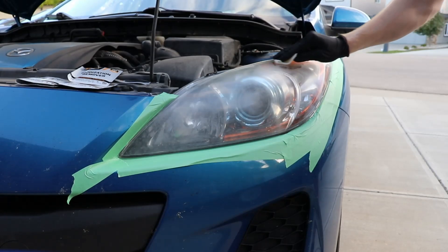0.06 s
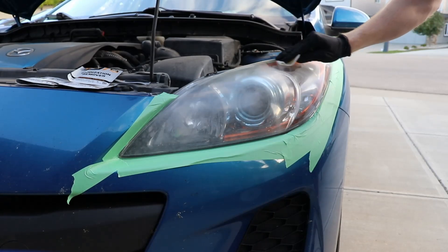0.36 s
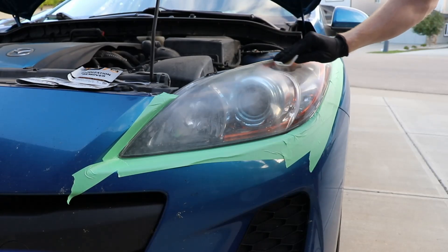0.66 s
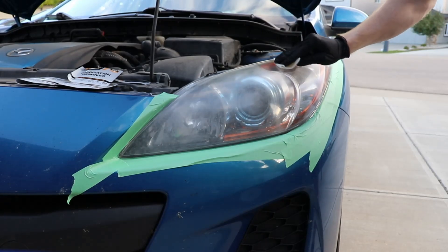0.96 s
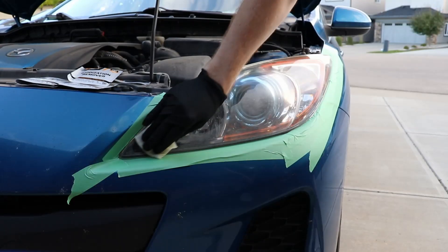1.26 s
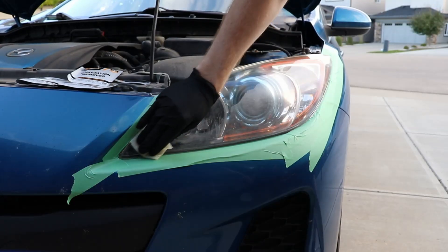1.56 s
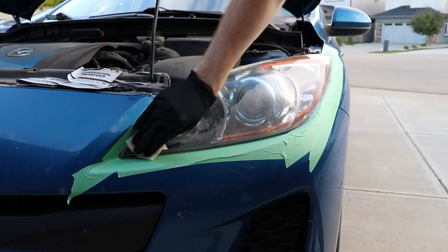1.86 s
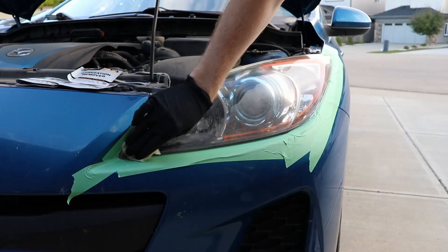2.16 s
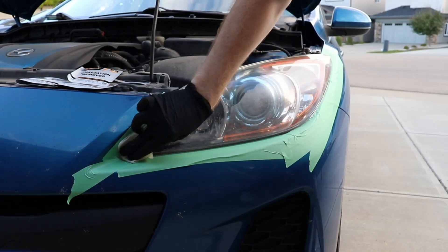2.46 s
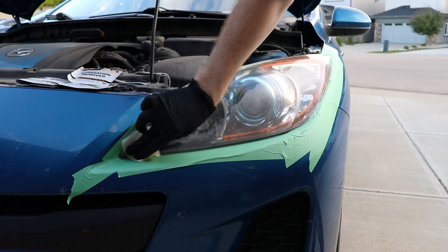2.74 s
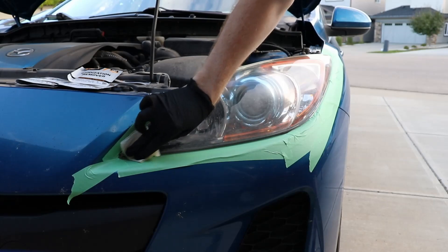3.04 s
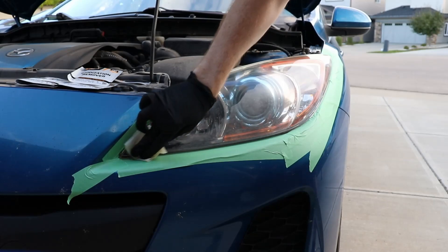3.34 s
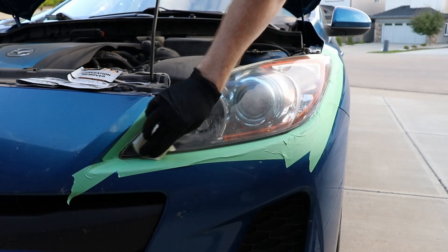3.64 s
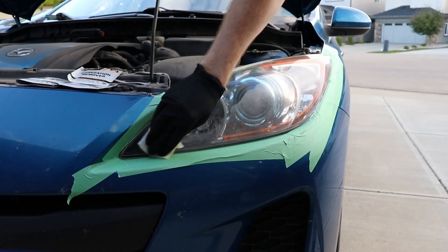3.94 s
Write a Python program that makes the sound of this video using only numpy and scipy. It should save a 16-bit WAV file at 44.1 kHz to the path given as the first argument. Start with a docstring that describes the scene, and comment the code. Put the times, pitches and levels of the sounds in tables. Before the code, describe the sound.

An abrasive pad rubs a plastic headlight close by, with a few faint, hissing strokes in the first second. From about 1.2 seconds to the end at 4, it scrubs in short, firmer, scratchy strokes. A low outdoor rush and a distant engine drone lie behind, with a soft wind puff near 0.6 seconds. Around 2.8 seconds a second engine revs up, holding its pitch from about 3.3.

```python
"""On a driveway, an abrasive pad is rubbed by hand over a plastic headlight lens: lightly at the far end,
then in short, firm strokes at the near corner. Countless tiny slips blur into scrape, hiss and fizz,
patches of the plastic ring under the pressure, and a few grains of grit catch with a tick.
Behind it sits a bed of outdoor rush with one puff of wind. A distant engine drones, and a second engine
runs up and holds its speed, both humming on multiples of their firing rate."""
import sys
import numpy as np
from scipy import signal
from scipy.fft import rfft, irfft, next_fast_len
from scipy.io import wavfile
from scipy.ndimage import uniform_filter1d, map_coordinates

SR = 44100
rng = np.random.default_rng(int(sys.argv[2]) if len(sys.argv) > 2 else 0)


def to_wav(sig):
    """Store sig (one row per channel, or 1-D mono) as 16-bit WAV at the path in sys.argv[1].

    Samples outside -1..1 are clipped; the rate is SR.
    """
    pcm = np.clip(np.atleast_2d(sig), -1, 1) * 32767
    pcm = np.round(pcm).astype(np.int16)
    wavfile.write(sys.argv[1], SR, pcm.T)  # frames by channels


N = 176400

# The hand's strokes. Each row: start, length and attack in seconds, level in dB,
# scrape offset in dB, fizz and air offset in dB.
PAD_STROKES = [(0.0, 0.14, .03, -62.5, 1.5, 2.5), (0.154, 0.31, .03, -61, 0, 2),
               (0.494, 0.27, .04, -62, -8, 2), (.81, 0.12, .05, -61, -12, 3),
               (1.162, 0.042, 0.004, -51, 1, -3), (1.209, 0.071, .03, -53.5, -4, -0.5),
               (1.302, 0.13, 0.027, -54.5, -4.5, -2), (1.451, 0.055, 0.031, -53, -4, -1),
               (1.505, 0.059, 0.04, -50, -2, -1.5), (1.592, 0.12, 0.022, -54.5, 0, -2),
               (1.72, 0.057, .04, -52, -8.5, -2), (1.782, 0.074, 0.062, -49.5, 1.5, -1.5),
               (1.879, 0.087, 0.051, -52.5, -2.5, -1), (1.981, 0.04, 0.027, -53.5, 3, -15),
               (2.034, 0.028, 0.01, -49.5, 0.5, -4), (2.076, 0.093, 0.03, -52.5, 2.5, 0),
               (2.208, 0.039, 0.022, -60, 7, -8), (2.237, 0.05, .008, -51, 2.5, -2),
               (2.36, 0.12, 0.033, -51.5, 0.5, -2), (2.52, 0.082, 0.1, -52, -2.5, -6.5),
               (2.681, 0.086, 0.092, -55, 1.5, -1), (2.777, 0.1, .06, -51, -1.5, -1.5),
               (2.879, 0.04, .04, -51.5, -6, -8), (2.955, 0.11, 0.058, -55, 0, -1),
               (3.113, 0.057, 0.012, -52, 0.5, -1.5), (3.181, 0.05, .04, -53, -3, -9),
               (3.242, 0.069, .02, -55, 1.5, -1), (3.315, 0.047, .015, -49.5, -1.5, -7),
               (3.398, 0.082, 0.068, -53.5, 3, 1.5), (3.482, 0.11, .04, -54, 2, -2),
               (3.59, 0.099, .04, -54, 0.5, -5.5), (3.691, 0.11, 0.038, -52.5, 1, 0),
               (3.787, 0.12, 0.041, -51.5, -2, -2), (3.901, 0.061, 0.038, -54.5, 0, -3),
               (3.972, 0.089, 0.028, -53, 5.5, -2)]
# The pad's four voices, dark to bright. Each row: frequency in Hz, relative level in dB per Hz.
SCRAPE_COLOUR = [(150, -2), (400, 1.5), (800, 8), (1300, 6), (1900, 5), (2500, 2), (3100, 2.5),
                 (4000, -7.5), (6000, -23)]
HISS_COLOUR = [(1500, -44), (3000, -10), (4100, -2), (5600, -2.5), (6600, -7.5), (8000, -12.5),
               (12000, -31), (16000, -24)]
FIZZ_COLOUR = [(4000, -20), (6500, -3), (8000, 0), (9000, -0.5), (10200, -4.5), (11200, -13.5),
               (12300, -11), (13500, -18), (15800, -27)]
AIR_COLOUR = [(7000, -42), (10000, 1), (11500, 3), (12400, -.5), (13500, -5), (15800, -3)]
# Stereo width of the rubbing. Each row: frequency in Hz, left-right likeness from -1 to 1.
PAD_LIKENESS = [(300, 0.88), (1500, 0.28), (3500, 0.56), (6000, 0.26), (9000, 0.68), (15000, 0.28)]
# The lens reaches the left ear first. Each row: frequency in Hz, left lead in radians.
LENS_LEAD = [(100, 12.4), (1000, 0.58), (3000, 1.02), (5000, 1.5), (6500, 2.2), (8000, 2.37), (10000, 2.06),
             (12000, 3.3), (15500, 3.45)]
# Balance of the lens. Each row: frequency in Hz, left over right in dB.
LENS_PAN = [(500, 9.5), (1000, -3.5), (2000, -2.5), (4000, -1), (8000, 2.5), (13000, 2.5)]
# Patches that resonate where the pad bears down.
# Each row: start and length in seconds, first and last pitch in Hz, level in dB.
LENS_RINGS = [(0.191, 0.86, 10000, 9920, -62.5), (0.51, 0.058, 4700, 4770, -59),
              (1.165, 0.026, 1150, 1316, -50.5), (1.168, 0.074, 9100, 8400, -53.5),
              (1.528, .038, 3770, 2980, -55), (1.769, 0.06, 8700, 9100, -51),
              (2.027, 0.051, 4800, 2720, -50), (2.089, 0.053, 3370, 1475, -55.5),
              (2.374, 0.036, 4200, 2770, -50.5), (2.427, .045, 2990, 2890, -54),
              (2.37, 0.23, 9000, 9000, -60), (2.79, 0.074, 4600, 5130, -56), (3.317, .04, 6230, 5250, -51),
              (3.411, 0.17, 4290, 4690, -53.5)]
# Grit catching on the lens. Each row: start in seconds, relative level in dB, pitch in Hz.
GRIT_TICKS = [(.205, -46, 10900), (.646, -43, 9500), (2.53, -46, 14300), (2.675, -47, 8000),
              (3.101, -48, 12500)]

# The engine that runs up. Each row: time in seconds, firing rate in Hz, firing tone in dB, overtones in dB.
REV_CURVE = [(2.82, 65, -62, -52), (2.92, 71.82, -43.5, -49), (3.025, 81.5, -35.5, -52.5),
             (3.065, 85, -38, -36.5), (3.11, 89.25, -34.5, -40), (3.15, 90.85, -32, -34),
             (3.195, 93.14, -29.5, -49.5), (3.285, 98.57, -39, -42.5), (3.34, 98.56, -39, -35.5),
             (3.45, 100.5, -35.5, -40), (3.55, 100.3, -40.5, -38.5), (3.79, 99.3, -35.5, -39.5),
             (3.92, 100, -43, -37.5), (4, 101.4, -45, -39)]
# Its overtones and its full-throttle growl. Each row: multiple of the firing rate, offset in dB.
REV_OVERTONES = [(.5, -16.5), (1.5, -22), (2, -0.5), (3, -16.5), (4, -14.5), (4.5, -25.5), (6, -24)]
GROWL_OVERTONES = [(4, 0.5), (4.5, -0.5)]
# Its exhaust rumble, strongest under load. Each row: time in seconds, level in dB.
REV_RUMBLE = [(2.6, -70), (2.76, -46), (3.1, -44.5), (3.45, -48.5)]
# Exhaust noise: gas rasp and low rumble. Each row: frequency in Hz, relative level in dB per Hz.
RASP_COLOUR = [(150, -18), (260, 12.5), (340, 4), (430, 10), (560, -3), (800, 8), (1600, -27.5)]
RUMBLE_COLOUR = [(45, -32), (80, 3.5), (135, 6), (175, 4), (260, -35.5)]
# The far engine's fades. Each row: time in seconds, level in dB, upper overtone offset in dB.
DRONE_FADES = [(0, -46.5, 5), (.35, -45, -2), (.8, -43.5, -3), (1.28, -44, -12), (1.38, -52.5, -4),
               (1.8, -56.5, -2), (2.1, -43.5, -4), (2.4, -51.5, -5), (2.8, -42.5, -4), (3.2, -47.5, -0.5),
               (4, -58, 11)]
# Its low and upper tones. Each row: multiple of the firing rate, offset in dB.
DRONE_LOW_TONES = [(1, -10), (2, -0.5)]
DRONE_UPPER_TONES = [(3, -7), (5, -15.5)]
# The outdoor bed and the wind puff. Each row: frequency in Hz, relative level in dB per Hz.
RUSH_COLOUR = [(20, -10), (35, -9), (55, 6.5), (75, 3.5), (110, -0.5), (160, -4), (250, -7), (450, -7.5),
               (650, -12), (900, -10), (1300, -10.5), (1800, -17), (2500, -23.5), (4500, -24.5),
               (7000, -28.5), (10000, -29.5), (13000, -31.5), (16000, -38)]
PUFF_COLOUR = [(15, -3), (35, -2), (65, -1), (120, 0), (400, -51)]
# Stereo width of the background noise. Each row: frequency in Hz, left-right likeness from -1 to 1.
OUTDOOR_LIKENESS = [(60, 0.98), (130, 0.91), (290, 0.82), (600, 0.73), (1200, -0.07), (2500, -0.067),
                    (6000, 0.054), (15000, -0.57)]

NEAR_S, CREEP_DB = 1, -63  # on the near corner the pad never quite rests between strokes
PAUSE_S, PAUSE_LENGTH_S = 3.055, 0.046  # except for one full stop
GRIT_PER_S, GRIT_SHARE, GRIT_SPREAD_DB = 2500, 0.28, 3.5
JUDDER_PER_S, JUDDER_DB, PATCHY_DB = 50, 0.13, 1.7
RING_Q, RING_FADE_S = 7.4, 0.0087
TICK_T60_S, TICK_WIDTH_OCT = 0.041, 0.23
REV_JITTER, REV_FLUTTER_DB, RASP_DB, GROWL_DB = 0.0088, 1.77, -15, -48.5
DRONE_HZ, DRONE_FLUTTER_DB, ENGINE_WANDER = 57.26, 2, 0.0077
RUSH_DB, RUSH_DB_PER_S, RUSH_SWELL_DB, PUFF_DB = -43.5, 0.32, 0.6, -39.5
BACK_PAN_DB, TOP_HZ = 0.7, 15780


def pad():
    """Each stroke rises, crests and lets go, with its own mix of scrape, hiss, fizz and air."""
    t = np.arange(N) / SR
    creeping = (t > NEAR_S) & ((t < PAUSE_S) | (t > PAUSE_S + PAUSE_LENGTH_S))
    scrape = hiss = fizz = amp(CREEP_DB) ** 2 * creeping
    air = np.zeros(N)
    for start, length, attack, db, scrape_db, fizz_db in PAD_STROKES:
        from_middle = np.clip(2 * (t - start) / length - 1, -1, 1)
        dome = 1 - 0.14 * from_middle ** 2  # power eases off towards the ends
        drive = swell(start, length, attack, release=0.028) * dome
        scrape = scrape + amp(db + scrape_db) ** 2 * drive
        hiss = hiss + amp(db) ** 2 * drive
        # The top end needs speed: it comes last and goes first.
        fizz = fizz + amp(db + fizz_db) ** 2 * drive ** 1.7
        air = air + amp(db + fizz_db) ** 2 * drive ** 1.9
    voices = [(scrape, SCRAPE_COLOUR, 1.5), (hiss, HISS_COLOUR, -0.25),
              (fizz, FIZZ_COLOUR, 0.5), (air, AIR_COLOUR, -5)]
    rub = sum(amp(trim_db) * np.sqrt(power) * friction(colour) for power, colour, trim_db in voices)
    return rub * amp(JUDDER_DB * wobble(JUDDER_PER_S))


def friction(colour):
    """Tiny slips blur into noise and larger grains crackle; the colour drifts as the contact moves."""
    hits = rng.random(N) < GRIT_PER_S / SR
    grains = hits * amp(GRIT_SPREAD_DB * np.minimum(rng.exponential(size=N), 4))
    slips = np.sqrt(1 - GRIT_SHARE) * noise() + np.sqrt(GRIT_SHARE) * unit(grains * noise())
    bands = signal.stft(slips, nperseg=512)[2]
    drift = uniform_filter1d(rng.standard_normal(bands.shape[1:]), size=6, axis=0)  # smooth in frequency
    drift = uniform_filter1d(drift, size=14, axis=1)  # and in time
    patchy = signal.istft(bands * amp(PATCHY_DB * unit(drift)))[1][:, :N]
    return stereo(patchy, colour, PAD_LIKENESS)


def lens_rings():
    """Friction drives damped resonances of the plastic, which slide in pitch as the pad moves on."""
    t, out = np.arange(N) / SR, np.zeros((2, N))
    drive = friction(colour=[(1, 0)])  # flat
    for start, length, first_hz, last_hz, db in LENS_RINGS:
        mode = filtered(drive, lambda hz: 1j * hz / (first_hz ** 2 - hz ** 2 + 1j * hz * first_hz / RING_Q))
        power = swell(start, length, RING_FADE_S, RING_FADE_S)
        on = power > 0
        shift_hz = np.interp(t[on], [start, start + length], [0, last_hz - first_hz])
        sliding = signal.hilbert(unit(mode)[:, on]) * np.exp(1j * phase_of(shift_hz))
        out[:, on] += amp(db) * np.sqrt(power[on]) * sliding.real
    return out


def grit_ticks():
    """A grain catches and lets go with a thin, short snap."""
    t, out = np.arange(N) / SR, np.zeros((2, N))
    for start, db, pitch_hz in GRIT_TICKS:
        band = unit(filtered(noise(), lambda hz: bell(np.log2((hz + 1) / pitch_hz), TICK_WIDTH_OCT)))
        decay = (t >= start) * amp(db - 60 * np.abs(t - start) / TICK_T60_S)
        out += band / 2 * decay
    return out


def rising_engine():
    """It rumbles, booms and growls on the way up, then holds its speed; every firing puffs out gas."""
    t = np.arange(N) / SR
    rate_hz, firing_db, overtones_db = curves(REV_CURVE)
    rate_hz = rate_hz * (1 + ENGINE_WANDER * wobble(20) + REV_JITTER * wobble(70))  # uneven firing
    pulses = unit(1 + np.cos(phase_of(rate_hz)))
    rasp = amp(overtones_db + RASP_DB) * pulses * outdoor_noise(RASP_COLOUR)
    rumble = amp(curves(REV_RUMBLE)[0]) * outdoor_noise(RUMBLE_COLOUR)
    full_throttle = bell(t - 3.14, width=0.029)
    growl = exhaust_tones(rate_hz, GROWL_DB, GROWL_OVERTONES, REV_FLUTTER_DB) * full_throttle
    boom = exhaust_tones(rate_hz, firing_db, [(1, 0)], REV_FLUTTER_DB)
    overtones = exhaust_tones(rate_hz, overtones_db, REV_OVERTONES, REV_FLUTTER_DB)
    return boom + overtones + growl + rasp + rumble


def far_engine():
    """A steady drone, wrapped in a loose rumble, fades and returns on the air."""
    db, upper_db = curves(DRONE_FADES)
    rate_hz = DRONE_HZ * (1 + ENGINE_WANDER * wobble(8))
    rumble = amp(db - 10) * outdoor_noise(RUMBLE_COLOUR)
    low = exhaust_tones(rate_hz, db, DRONE_LOW_TONES, DRONE_FLUTTER_DB)
    upper = exhaust_tones(rate_hz, db + upper_db, DRONE_UPPER_TONES, DRONE_FLUTTER_DB)
    return rumble + low + upper


def exhaust_tones(rate_hz, level_db, tones, flutter_db):
    """Tones on multiples of the firing rate, each fluttering in the moving air."""
    phase, out = phase_of(rate_hz), np.zeros(N)
    for multiple, db in tones:
        gain = amp(level_db + db + flutter_db * wobble(14))
        out += gain * np.sin(multiple * phase + 2 * np.pi * rng.random())
    return np.sqrt(2) * out


def outdoor_rush():
    """A bass-heavy bed of noise that breathes a little and slowly grows."""
    t = np.arange(N) / SR
    rise_db = RUSH_DB_PER_S * (t - t.mean())
    return outdoor_noise(RUSH_COLOUR) * amp(RUSH_DB + rise_db + RUSH_SWELL_DB * wobble(2.42))


def wind_puff():
    """One soft, low puff of wind on the microphone."""
    t = np.arange(N) / SR
    return outdoor_noise(PUFF_COLOUR) * amp(PUFF_DB) * bell(t - 0.62, width=0.042)


def outdoor_noise(colour):
    """Coloured noise, centred in the bass and wide on top."""
    return stereo(noise(), colour, OUTDOOR_LIKENESS)


def stereo(pair, colour, likeness):
    """Two unrelated signals become a coloured, partly alike left and right of rms 1."""
    def mid_side(hz):
        angle = np.arccos(along(likeness, hz)) / 2
        return amp(along(colour, hz)) * [np.cos(angle), np.sin(angle)]
    mid, side = filtered(pair, mid_side)
    return unit(np.array([mid + side, mid - side]))


def swell(start, length, attack, release):
    """A smooth rise, hold and release from 0 to 1; times in seconds."""
    t = np.arange(N) / SR
    ramp = np.clip(np.minimum((t - start) / attack, (start + length - t) / release) + .5, 0, 1)
    return ramp ** 2 * (3 - 2 * ramp)


def bell(offset, width):
    """A bell curve that peaks at 1 at zero offset."""
    return np.exp(-.5 * (offset / width) ** 2)


def noise():
    """Two unrelated channels of white noise."""
    return rng.standard_normal((2, N))


def wobble(rate):
    """A smooth random curve, rate knots a second."""
    return map_coordinates(rng.standard_normal(N // 20), [np.arange(N) * rate / SR], mode="wrap")


def phase_of(hz):
    """Running phase of a moving pitch, in radians."""
    return 2 * np.pi * np.cumsum(hz) / SR


def curves(rows):
    """One automation curve for each column after the time."""
    times, *columns = np.transpose(rows)
    return [np.interp(np.arange(N) / SR, times, column) for column in columns]


def along(points, hz):
    """Read (Hz, value) points on a log axis."""
    knots_hz, values = np.transpose(points)
    return np.interp(np.log(hz + 1), np.log(knots_hz + 1), values)


def filtered(x, response):
    """Shape x with a complex frequency response."""
    size = next_fast_len(N + SR // 2)
    return irfft(rfft(x, size) * response(np.fft.rfftfreq(size, 1 / SR)), size)[..., :N]


def amp(db):
    """Decibels to gain."""
    return 10 ** (np.asarray(db) / 20)


def unit(x):
    """Scale to rms 1."""
    return x / np.sqrt(np.mean(x ** 2) + 1e-20)


def scene():
    """The lens sits up front, a little to the left; the outdoor bed and the engines lie behind it."""
    sides = np.array([[.5], [-.5]])
    placement = lambda hz: amp(sides * along(LENS_PAN, hz)) * np.exp(1j * sides * along(LENS_LEAD, hz))
    lens = filtered(pad() + lens_rings() + grit_ticks(), placement)
    background = outdoor_rush() + wind_puff() + far_engine() + rising_engine()
    return lens + background * amp(sides * BACK_PAN_DB)


def record(dry):
    """A brick-wall low-pass takes off the very top."""
    return filtered(dry, lambda hz: hz < TOP_HZ)


dry = scene()
out = record(dry)
to_wav(out)
```